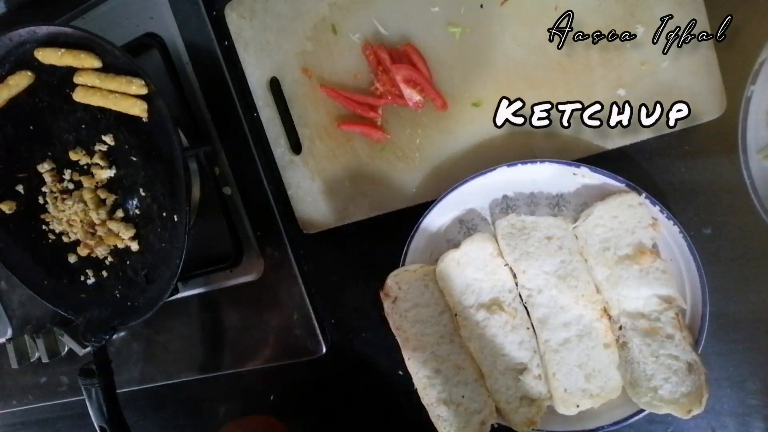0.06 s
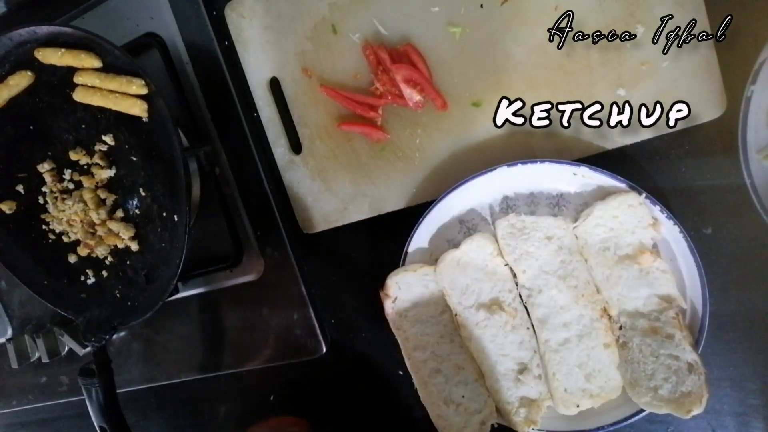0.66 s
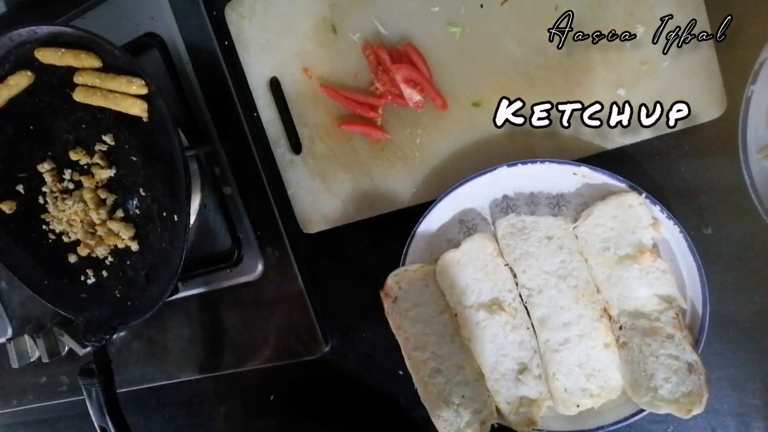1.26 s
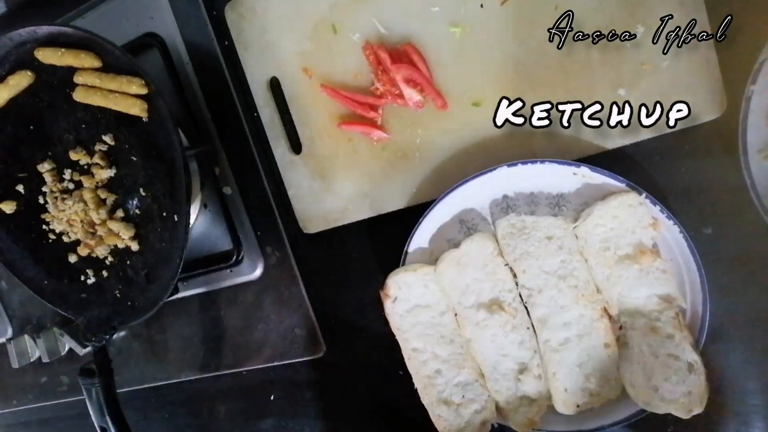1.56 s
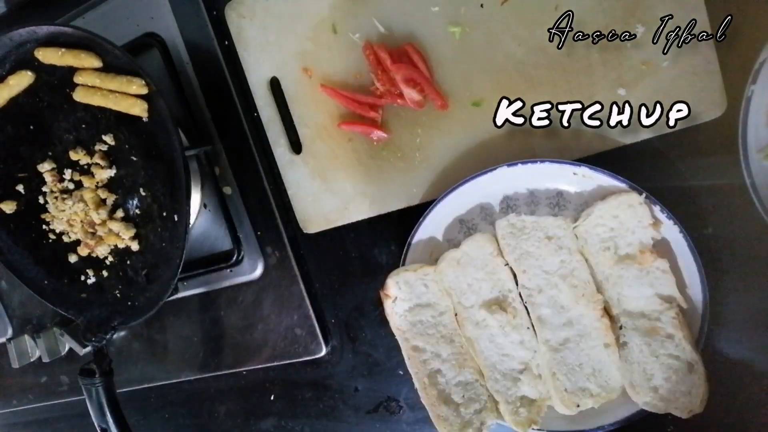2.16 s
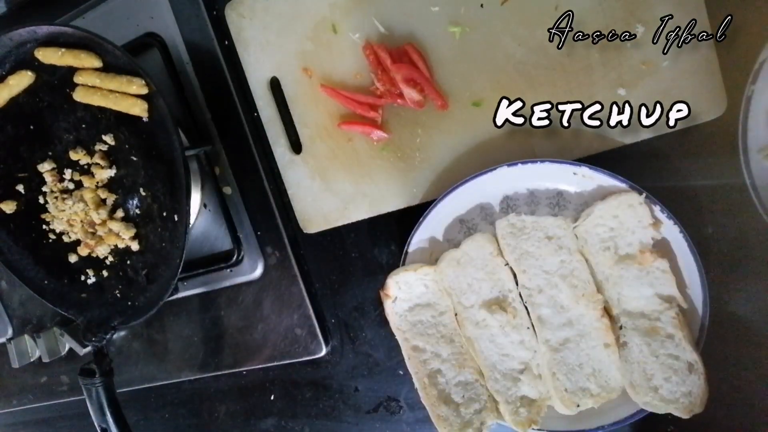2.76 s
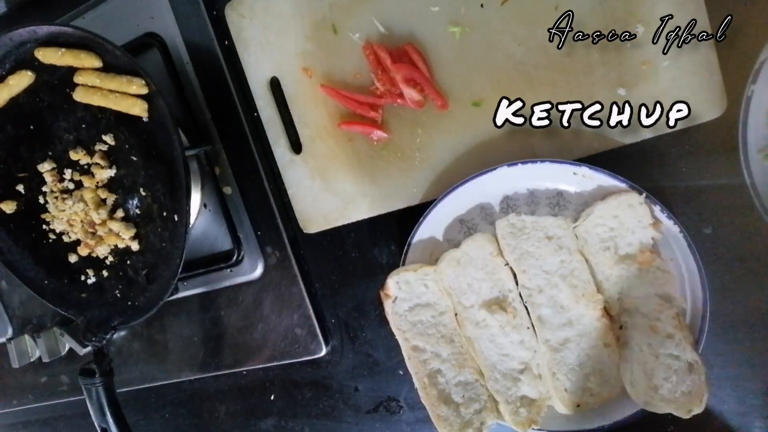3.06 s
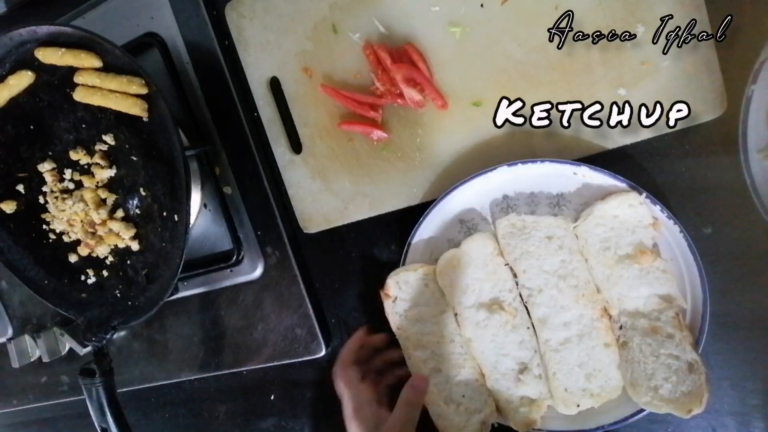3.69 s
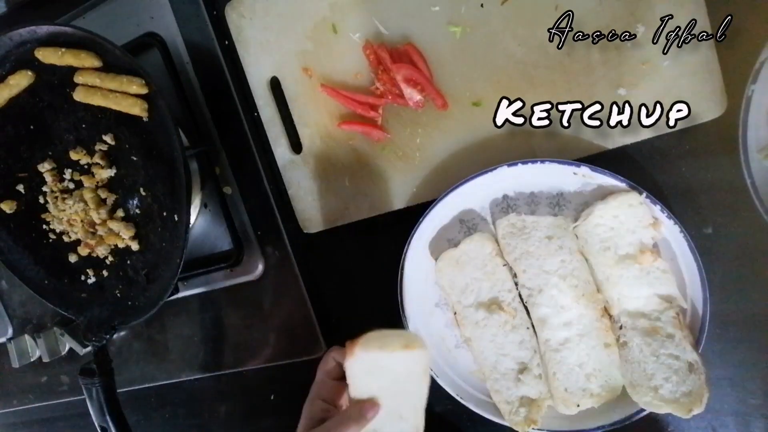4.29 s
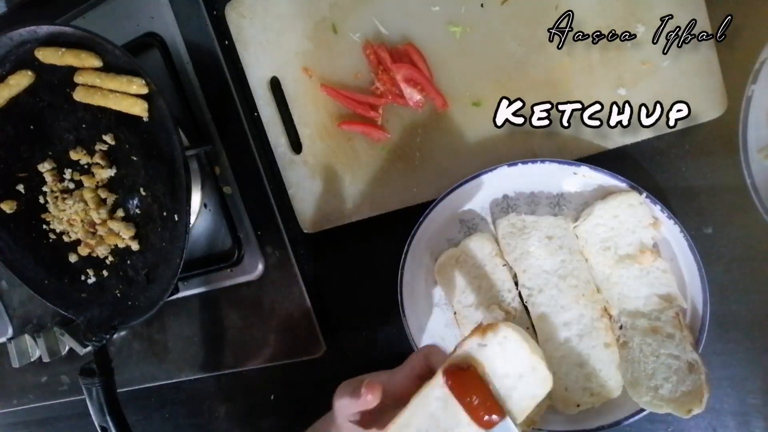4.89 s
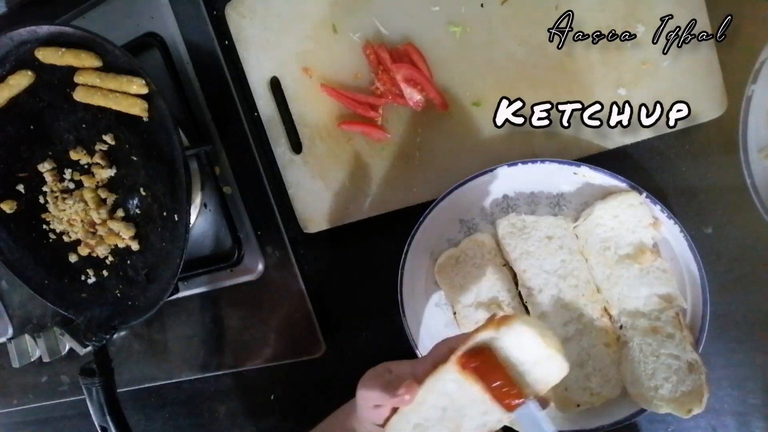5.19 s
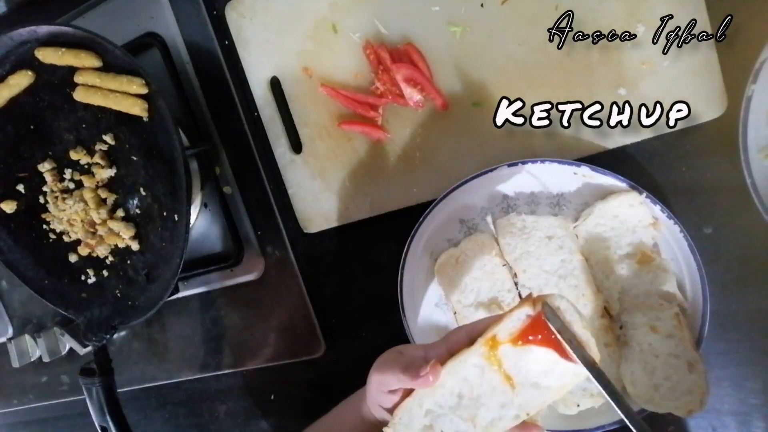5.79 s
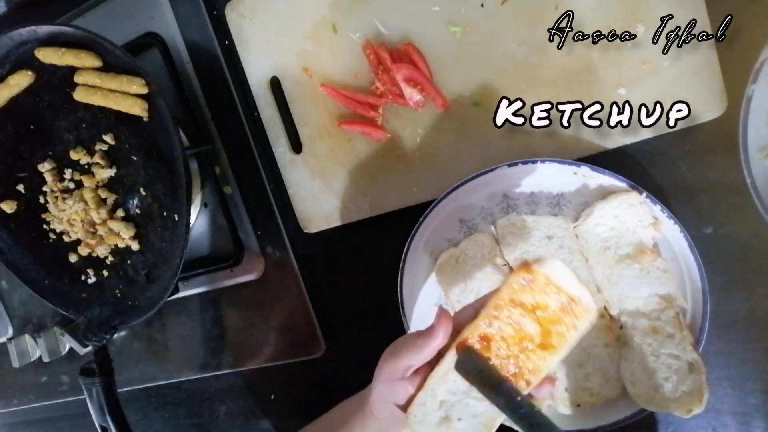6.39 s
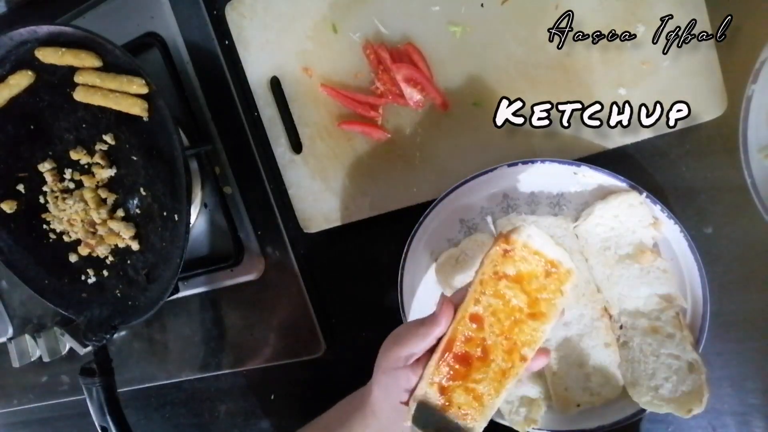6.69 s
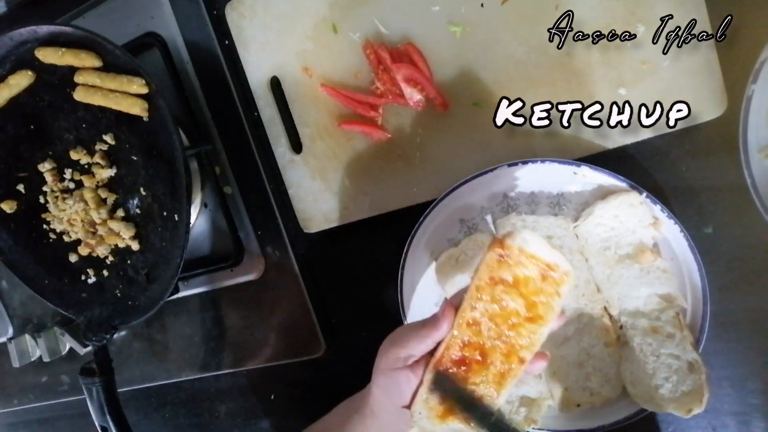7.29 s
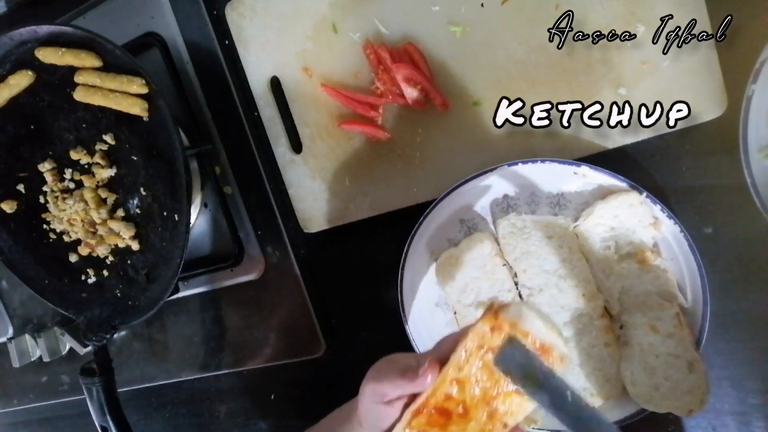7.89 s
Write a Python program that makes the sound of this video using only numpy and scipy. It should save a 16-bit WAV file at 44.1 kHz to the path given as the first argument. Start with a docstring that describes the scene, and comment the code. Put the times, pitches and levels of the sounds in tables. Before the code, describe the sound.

Close over a kitchen counter, a clink dies away and steel cutlery slides on crockery with brief, rough squeals during the first second, while a very faint car horn fades far off to the left. Light cutlery clinks follow from about 1.2 to 2.2 seconds. At 2.3 a plate's rim is struck sharply, and at 2.5 and 2.7 a dish lands in two double knocks that ring the counter, the loudest moment. Around 4 seconds come a few more clinks and a short squeak. From 5 to 5.6 the crust of a toasted bun crackles faintly in a hand. A knife then scrapes a spread across it, with a longer stroke from 6 to 6.9 and a shorter one from 7.2 to 7.6, breaking crumbs and catching on ridges. Low room air, an appliance hum and a soft hiss continue underneath.

```python
"""Spreading a toasted bun.

Close over a kitchen counter, steel cutlery clinks, slides and squeals on crockery. A plate's rim is
struck and a dish lands in two double knocks that ring the counter. Crust crackles in the hand, then
a knife scrapes a spread over the bun in two strokes, breaking crumbs and catching on ridges.
A far car horn fades at the start; low room air, an appliance hum and a soft hiss lie underneath."""
import sys
import numpy as np
from scipy import signal
from scipy.fft import rfft, irfft
from scipy.io import wavfile
from scipy.ndimage import uniform_filter1d

SR = 44100
rng = np.random.default_rng(int(sys.argv[2]) if len(sys.argv) > 2 else 0)


def to_wav(sig):
    """Store sig (one row per channel, or 1-D mono) as 16-bit WAV at the path in sys.argv[1].

    Samples outside -1..1 are clipped; the rate is SR.
    """
    pcm = np.clip(np.atleast_2d(sig), -1, 1) * 32767
    pcm = np.round(pcm).astype(np.int16)
    wavfile.write(sys.argv[1], SR, pcm.T)  # frames by channels


N = 355005
T = np.arange(N) / SR


def knife_on_bun(flakes_db=-9, blade_db=-6, stall_db=-7, touch_s=0.043, press_in_db=17.5, tip_db=-2):
    """The blade breaks crumbs and flakes over the bun's hollow rasp; at ridges it stalls and crunches."""
    # firm strokes, each followed by a light wipe:
    # start_s, press_in_s, length_s, level_db, hollow_db, left_minus_right_db, lift_db_per_s
    strokes = [(6.129, 0.27, 0.62, -44.5, -2.5, 0, 320), (6.788, 0.068, 0.095, -45.5, -15, 3, 452),
               (7.25, 0.14, 0.14, -38.5, 0.5, 0, 158), (7.459, 0.015, 0.12, -52, -18, 6, 300)]
    # ridges of crust that catch the blade: start_s, level_db, length_s, stall_before_s
    catches = [(5.999, -52, 0.041, 0.01), (6.151, -46, 0.009, 0.01), (6.298, -47.5, 0.027, 0.0037),
               (6.4315, -44.5, 0.021, 0.019), (6.518, -52, 0.0084, 0.028), (6.749, -43, 0.013, 0.037),
               (6.811, -47, 0.017, 0.016), (7.304, -47, 0.013, 0.02), (7.487, -40, 0.0096, 0.015),
               (7.531, -50.5, 0.022, 0.009), (7.585, -47, 0.023, 0.015)]
    # tone of the hollow rasp, the crumbs and the crisp flakes: frequency_hz, level_db
    rasp_colour = [(200, -82), (550, -11.5), (820, -3.5), (1050, 3), (1400, 3), (1870, -0.5), (2250, 1),
                   (3000, 0), (4200, -5), (6600, -31)]
    crumb_colour = [(500, -56), (1470, -26), (2400, -3), (2950, -8.5), (4100, -13.5), (5000, 1), (5900, 0),
                    (6700, 3), (7400, 4), (8000, -5), (10500, -9), (12700, -9), (15000, -15), (15800, -43)]
    flake_colour = [(3000, -13), (8500, -22), (11400, -4), (11850, 5.5), (12500, -12), (13200, 2),
                    (13700, 0), (14800, 9), (15600, -29)]
    # the blade's ring, damped by the bun: pitch_hz, level_db, t60_s
    blade_modes = [(2980, -5, .016), (5820, 0, .02), (6200, -2, .016), (7450, -3, .014), (11900, -8, .012)]
    # resonances shift as the contact moves
    rasp = colour(friction(per_s=2200, spread_db=2.6, smear_s=.012), rasp_colour)
    rasp = unit(drift(rasp, share=.08, rate_hz=14))
    crumbs = drift(friction(per_s=2900, spread_db=3.3, smear_s=.009), share=.05, rate_hz=12)
    crumbs = unit(colour(crumbs, crumb_colour))
    flakes = unit(colour(friction(per_s=600, spread_db=3.2, smear_s=.005), flake_colour))
    blade = through(friction(per_s=2000, spread_db=3, smear_s=.005), ring(blade_modes)[None])
    blade = drift(unit(blade), share=.02, rate_hz=10)
    crisp = 0.95 * crumbs + amp(flakes_db) * flakes + amp(blade_db) * blade
    drag = unit(amp(1.6 * walk(110)))
    for start, _, length, stall_s in catches:
        times = [start - stall_s, start - stall_s / 2, start, start + length]
        drag *= np.interp(T, times, [1, amp(stall_db), amp(stall_db), 1])
    out, pressed = np.zeros((2, N)), np.zeros(N)
    for start, press_s, length, db, hollow_db, side_db, lift_db_per_s in strokes:
        age = T - start
        contact = np.clip(age / touch_s, 0, 1) * amp(-lift_db_per_s * np.clip(age - length, 0, 1))
        force = amp(db - press_in_db * np.clip(1 - age / press_s, 0, 1))
        # tipping towards its edge, the blade loses some rasp
        hollow = amp(hollow_db + tip_db * np.clip(age / length, 0, 1) ** 2)
        out += contact * force * drag * pan(side_db) * (crisp + hollow * rasp)
        pressed += contact * hollow
    # a catch sounds hollower the harder the blade bears on the bun
    crunch = crisp + (amp(-15) + amp(-4) * pressed) * rasp
    out += crunch * sum(amp(db + 1) * grip(start, length) for start, db, length, _ in catches)
    out += amp(-53) * grip(start_s=7.188, length_s=0.01) * rasp  # the flat laid on the soft crumb
    return out + room(out, wet_db=-8.5)


def dish_down(clack_db=-6, counter_db=-31, rattle_db=-30, crack_db=-41, rise_s=0.0017, side_db=-7):
    """Each knock clacks the dish, rings the counter and rattles what is on it; long contact is duller."""
    # the dish meeting the counter: start_s, level_db, contact_ms
    knocks = [(2.501, 3, 0.14), (2.532, -4.5, 0.77), (2.7148, -3.5, 0.8), (2.728, -9, 0.84)]
    # the dish's short clack and the counter's longer ring: pitch_hz, level_db, t60_s
    dish_modes = [(974, -3.5, 0.02), (1096, -4, 0.018), (1800, -7, 0.015), (480, -34, 0.015)]
    counter_modes = [(129, 0, .24), (328, -19, .5), (388, -10, .34), (458, -20, .5), (592, -14, .45),
                     (657, -12, .35), (727, -14, .45), (813, -13, .38), (920, -12, .22), (950, -11, .2),
                     (1044, -9, .16), (1244, -15, .25), (1357, -16, .26), (1507, -19, .33),
                     (1701, -16, .25), (1873, -18, .24)]
    # tone of the rattle: frequency_hz, level_db
    rattle_colour = [(47, -49.5), (80, -14.5), (130, -7), (232, -18.5), (385, -18.5), (487, -13),
                     (950, -9.5), (1160, -15.5), (1760, -17), (2070, -23.5), (2610, -27), (3750, -47.5),
                     (6000, -54), (7800, -83), (13200, -120)]
    blows = np.zeros(N)
    for start, db, contact_ms in knocks:
        push = np.exp(-T[:SR // 100] * 1000 / (contact_ms / 2))
        add(blows, start, amp(db) * push / push.sum())
    clack = amp(clack_db) * ring(dish_modes) * (1 - np.exp(-T[:SR] / rise_s))
    counter = amp(counter_db) * ring(counter_modes)
    rattle = colour(burst(t60_s=0.45), rattle_colour)
    rattle *= amp(rattle_db) / np.sqrt(np.mean(rattle[:, :SR // 20] ** 2))
    near = through(blows, (clack + counter + rattle) * pan(side_db))
    # only the first contact is hard enough to crack in the treble: frequency_hz, level_db
    crack_colour = [(2000, -5), (3800, -12.5), (5500, 14), (7000, -6), (9000, -42.5), (15000, -22.5)]
    crack = colour(burst(t60_s=0.019), crack_colour)
    add(near, knocks[0][0], amp(crack_db) * crack / np.abs(crack).max())
    near = butter(near, 85, "high")  # the counter radiates little below its lowest mode
    return near + room(through(blows, clack * pan(side_db)), wet_db=-9)


def rim_clink(start_s=2.3347, ring_db=-22, crack_db=-25, rise_s=.0018, side_db=-1):
    """A firm blow on a plate's rim: a dense crack and a quickly damped ring, carried on by the room."""
    # the plate's ring: pitch_hz, level_db, t60_s
    rim_modes = [(1350, -16, .014), (2520, -2, .014), (2700, -1.5, .014), (2980, -2.5, .012),
                 (4425, -8.5, .018), (4880, -8, .02), (5330, -4.5, .016), (6605, -11, .014),
                 (8915, -17, .012), (9940, -14, .012)]
    # tone of the crack: frequency_hz, level_db
    crack_colour = [(700, -25), (1300, -8), (2700, 0), (3700, -7), (5200, 2), (7800, -12),
                    (10000, -10), (11000, -28)]
    crack = colour(burst(t60_s=.024), crack_colour)
    build_up = 1 - np.exp(-T[:SR] / rise_s)
    out = np.zeros((2, N))
    add(out, start_s, amp(ring_db) * ring(rim_modes) * build_up * pan(side_db))
    add(out, start_s, amp(crack_db) * crack / np.abs(crack).max())
    return out + room(out, wet_db=0.8)


def cutlery_clinks(ring_db=-22, rise_s=0.002, chatter_t60_s=.014, bounce_s=0.013, bounce_db=-16):
    """Light touches chatter through the steel's modes, then ring; the struck spot favours two pitches."""
    # cutlery touching crockery:
    # start_s, level_db, treble_db, left_minus_right_db, free_ring_db, first_pitch_hz, second_pitch_hz
    clinks = [(0.244, -33.5, 5, 2, 1, 3500, 6610), (1.172, -41, 8, 0, 1, 2760, 2760),
              (1.2803, -39, 8.5, 0, -3, 2760, 6611), (1.405, -34.5, 11, 8.5, 9, 3400, 3100),
              (1.410, -39, 5, -12, -12, 5380, 6610), (1.818, -38.5, 10, -1, -4.5, 4460, 2720),
              (2.038, -47.5, 5.5, 7, 9, 2730, 6610), (2.116, -34.5, 6, -2, -6, 7860, 3430),
              (2.176, -45.5, 8, 0, -6, 7400, 9200), (3.923, -37.5, -9, -7, -5, 5380, 2400),
              (4.051, -36.5, -12, -6, 7, 4520, 5450), (4.079, -40, -15, -21.5, -6, 7450, 3100)]
    # the cutlery's ring: pitch_hz, level_db, t60_s
    steel_modes = [(1400, -7, .15), (2760, -2, .11), (2990, -2, .08), (3520, -3, .11), (3620, -7, .08),
                   (4560, -4, .12), (4820, -6, .12), (5380, -2, .22), (6611, -1, .15), (7400, -5, .1),
                   (9200, -8, .05), (11060, -8, .08)]
    # tone of the contact tick: frequency_hz, level_db
    tick_colour = [(600, -25), (1400, -2), (2000, -6), (2800, 0), (4200, 1.5), (6000, 0), (9000, -10),
                   (15000, -18)]

    def nearness(hz, spot_hz, width_octaves=.09):
        return np.exp(-(np.log2(hz / spot_hz) / width_octaves) ** 2)

    out = np.zeros((2, N))
    bite = np.minimum(T[:SR] / rise_s, 1)
    for start, db, treble_db, side_db, free_db, first_hz, second_hz in clinks:
        freedom = min(amp(free_db / 2), 1)  # steel that stays in contact rings weaker and shorter
        modes = [(hz, mode_db + 10 * nearness(hz, first_hz) + 7 * nearness(hz, second_hz), t60 * freedom)
                 for hz, mode_db, t60 in steel_modes]
        touch = burst(t60_s=0.03) * bite
        damped = ring([(hz, mode_db, chatter_t60_s) for hz, mode_db, _ in modes])
        chatter = through(touch, damped[None])[:, :SR]
        tone = [(hz, band_db + treble_db * (hz > 8000)) for hz, band_db in tick_colour]
        tick = colour(unit(chatter) + amp(1) * unit(touch), tone)
        tick /= np.abs(tick).max()
        after_ring = amp(ring_db + free_db) * ring(modes) * bite / 2
        add(out, start, amp(db) * pan(side_db) * (tick + after_ring))
        # a loosely held piece touches again, more softly
        add(out, start + bounce_s, amp(db + bounce_db) * pan(side_db) * tick)
    return out + room(out, wet_db=-5.5)


def steel_on_glaze(ring_db=-5.5, ring_t60_s=.014, judder_db=1.5, grip_s=0.00033, skid_s=0.12):
    """A clink dies away; then sliding steel judders over glaze, ringing and squealing as it goes."""
    # a steel clink dying away at the start, then slides on crockery:
    # start_s, length_s, level_db, skid_off_db, fade_db_per_s, left_minus_right_db
    contacts = [(0.0, 0.0027, -42, 1.5, 135, -3), (0.25, 0.29, -57, 1.5, 350, 1),
                (0.541, 0.033, -52, -0.5, 597, -1), (4.052, 0.17, -49.5, 4, 1100, -1.5)]
    # tone of the dying clink, then of the three slides, one list each: frequency_hz, level_db
    contact_colours = [
        [(700, -37), (1460, -25), (1900, -28), (2650, -6.5), (3700, -21), (4500, -10.5), (5200, -2.5),
         (5900, -7.5), (6500, -9), (8000, -15.5), (10000, -29), (11000, -26), (15000, -33)],
        [(600, -33), (1000, 1), (1250, -6.5), (1500, 7.5), (2000, -17), (2650, 5.5), (3300, -5), (4100, -5),
         (5500, -7), (6600, -2.5), (9000, -17), (15000, -26)],
        [(900, -25), (1600, -5), (2100, -1), (3050, 2.5), (4100, -10), (4800, -3), (6500, -10), (8000, -8),
         (10000, -29), (15000, -25)],
        [(500, -50), (900, -12), (1200, -17), (1800, -10.5), (3200, -5.5), (4600, -3.5), (5350, -1),
         (6400, 0.5), (7400, -6.5), (8600, -16), (11000, -25), (15000, -30)],
    ]
    # the ring of steel pressed on glaze: pitch_hz
    pressed_modes = [2650, 3200, 3900, 4600, 5300, 6380, 6680, 7400, 9780, 10600, 11800, 12400, 14500]
    slips = friction(per_s=2700, spread_db=3, smear_s=0.025)
    singing = through(slips, ring([(hz, 0, ring_t60_s) for hz in pressed_modes])[None])
    singing = drift(singing, share=.02, rate_hz=35)  # the moving contact shifts the modes
    steel = (unit(slips) + amp(ring_db) * unit(singing)) * amp(judder_db * walk(140))
    out = np.zeros((2, N))
    for (start, length, db, skid_db, fade_db_per_s, side_db), tone in zip(contacts, contact_colours):
        past_end = T - start - length
        skid = np.exp(np.clip(past_end / skid_s, -20, 0))
        attack = np.clip((T - start) / grip_s, 0, 1)
        gain = amp(db - 1 + skid_db * skid - fade_db_per_s * np.clip(past_end, 0, 1))
        out += unit(colour(steel, tone)) * attack * gain * pan(side_db)
    out += squeals()
    return out + room(out, wet_db=-5)


def squeals(sag_share=0.0262, waver_share=.032, flutter_db=4.5, fall_power=1.97):
    """Sticking and slipping steel locks into brief rough tones that sag in pitch as they die."""
    # stick-slip tones: start_s, rise_s, length_s, pitch_hz, level_db, roughness
    tones = [(0.24, 0.0037, 0.35, 3540, -47.5, 0.58), (0.25, 0.037, 0.5, 1450, -61.5, 0.78),
             (0.333, 0.028, 0.14, 1013, -50.5, 1.1), (0.374, 0.033, 0.278, 2724, -51.5, 1.07),
             (0.495, 0.07, 0.22, 1592, -46, 0.68), (4.076, 0.0055, 0.059, 907, -46, 0.4),
             (4.11, 0.008, 0.22, 5420, -45.5, 0.32)]
    out = np.zeros(N)
    waver, flutter = walk(250)[:SR], walk(150)[:SR]
    for start, rise_s, length, hz, db, roughness in tones:
        progress = np.minimum(T[:SR] / length, 1)
        pitch_hz = hz * (1 - sag_share * progress) * (1 + waver_share * roughness * waver)
        swell = np.minimum(T[:SR] / rise_s, 1) * (1 - progress) ** fall_power
        tremble = unit(amp(flutter_db * roughness * flutter))
        add(out, start, amp(db) * swell * tremble * sine(pitch_hz))
    return out


def bun_in_hand():
    """The crust gives a little and crackles under the fingers that hold the bun."""
    # small squeezes: start_s, level_db, length_s
    squeezes = [(5.03, -63, .07), (5.084, -59, .008), (5.2, -61, .008), (5.233, -61, .006),
                (5.36, -64, .06), (5.494, -57.5, .012), (5.559, -61, .006)]
    # tone of the crackle: frequency_hz, level_db
    crackle_colour = [(600, -20), (1500, -4), (2800, 0), (4100, -5), (6500, -2), (9000, -8), (15000, -16)]
    crackle = unit(colour(friction(per_s=900, spread_db=3.5, smear_s=.008), crackle_colour))
    out = crackle * sum(amp(db) * grip(start, length) for start, db, length in squeezes)
    return out + room(out, wet_db=-7)


def far_horn(fade_start_s=0.32, fade_end_s=1.0, flutter_db=2, waver_share=0.0151):
    """A far car horn's notes waver on their way in from the street, off to the left."""
    # the horn's chord: pitch_hz, level_db
    notes = [(350, -68.5), (420, -67.5), (495, -71.5), (1450, -81.5)]
    chord = sum(amp(db + flutter_db * walk(13.8)) * sine(hz * (1 + waver_share * walk(39.9)))
                for hz, db in notes)
    chord *= np.sqrt(2) * np.interp(T, [fade_start_s, fade_end_s], [1, 0])
    return chord * pan(side_db=23) + room(chord, wet_db=-4.5)


def room_tone(air_db=-59.5, hiss_db=-60.5, swell_db=1.3, alike_below_hz=350):
    """Low, gently swelling air, much alike on both sides in the bass, and an even hiss."""
    # tone of the kitchen's air and of its hiss: frequency_hz, level_db
    air_colour = [(12, -35.5), (20, 3.5), (33, -7.5), (75, -9.5), (136, 1.5), (246, -17), (306, -13.5),
                  (401, -16), (424, -14), (464, -14), (498, -15.5), (608, -12.5), (642, -15.5), (742, -14),
                  (797, -18), (1500, -28.5), (1950, -72), (3300, -120)]
    hiss_colour = [(710, -37), (1200, -31.5), (1340, -9), (1520, -11.5), (1930, -11), (2610, -8),
                   (2810, -7.5), (4020, -15), (5490, -5.5), (6600, -0.5), (7270, -4), (8730, -17.5),
                   (13600, -19), (15000, -16.5), (15800, -20)]
    mid, side = colour(rng.standard_normal((2, N)), air_colour)
    side = 0.19 * side + 0.61 * butter(side, alike_below_hz, "high", order=1)
    air = np.array([mid + side, mid - side]) / np.std(mid)
    air *= amp(air_db + swell_db * walk(5))
    hiss = amp(hiss_db) * unit(colour(rng.standard_normal((2, N)), hiss_colour))
    return air + hiss


def appliance_hum(trim_db=-1, flutter_db=0.89, waver_hz=1.823):
    """An appliance drones on a few partials, each wavering in level and pitch."""
    # the drone: pitch_hz, level_db, left_minus_right_db
    partials = [(108, -77, -6), (144.7, -79, -4), (307, -81.5, 24.5), (422, -91.5, 4), (507, -77.5, 7),
                (607.4, -77, 15.5), (730, -83.5, -4), (1014, -85.5, 19.5)]
    out = np.zeros((2, N))
    for hz, db, side_db in partials:
        gain = np.sqrt(2) * amp(db + trim_db + flutter_db * walk(4.9))
        out += gain * pan(side_db) * sine(hz + waver_hz * walk(12))
    return out


def room(x, wet_db, low_t60_s=0.64, high_t60_s=0.25, split_hz=2000, rise_s=0.0015):
    """The tiled kitchen's tail alone: it builds up quickly and its treble dies first."""
    tail = butter(burst(low_t60_s), split_hz, "low") + butter(burst(high_t60_s), split_hz, "high")
    return amp(wet_db) * through(x, tail * np.clip(T[:SR] / rise_s, 0, 1))


def friction(per_s, spread_db, smear_s, shared=0.34, direct_db=-4):
    """Dense, uneven slips: some arrive directly in the centre, the rest smeared by nearby surfaces."""
    slips = np.zeros((3, N))  # left, right, centre
    slipping = rng.random((3, N)) < per_s / SR
    polarity = np.sign(rng.standard_normal((3, N))[slipping])
    size = np.minimum(rng.exponential(size=(3, N))[slipping], 4)
    slips[slipping] = polarity * amp(spread_db * size)
    stereo = np.sqrt(shared) * slips[2] + np.sqrt(1 - shared) * slips[:2]
    return through(stereo, burst(smear_s)) + amp(direct_db) * slips[2]


def ring(modes):
    """Damped sines of alternating sign after one blow, from rows of pitch_hz, level_db, t60_s."""
    t = T[:SR // 2]
    sound = sum((-1) ** k * amp(db - 60 * t / max(t60, 1e-3)) * np.sin(2 * np.pi * hz * t)
                for k, (hz, db, t60) in enumerate(modes))
    return np.pad(sound, (0, SR - len(t)))


def burst(t60_s):
    """Dying noise of unit energy, unrelated left and right."""
    noise = rng.standard_normal((2, SR)) * np.exp(-np.log(1000) * T[:SR] / t60_s)
    return unit(noise) / np.sqrt(SR)


def grip(start_s, length_s):
    """Envelope of one brief contact: a quick bite and a rounded fall."""
    progress = np.clip((T - start_s) / length_s, 0, 10)
    return np.minimum(10 * progress, 1) * np.exp(-progress ** 2)


def drift(x, share, rate_hz):
    """Let all resonances of a sound wander up and down together by a share of their pitch."""
    warped_s = np.cumsum(1 + share * walk(rate_hz)) / SR % T[-1]
    return np.array([np.interp(warped_s, T, side) for side in x])


def walk(rate_hz):
    """Smooth random wander with a spread near 1."""
    hold = max(int(SR / rate_hz), 1)
    steps = np.repeat(rng.standard_normal(N // hold + 1), hold)
    return unit(uniform_filter1d(steps, hold)[:N])


def colour(x, points, size=8192):
    """Minimum-phase equaliser through points of frequency_hz, level_db."""
    hz, db = np.transpose(points)
    bins_hz = np.maximum(np.fft.rfftfreq(size, 1 / SR), 1)
    gain = amp(np.interp(np.log(bins_hz), np.log(hz), db))
    cepstrum = irfft(np.log(gain))
    # folded onto positive time, so nothing sounds ahead of an attack
    cepstrum[1:size // 2] *= 2
    cepstrum[size // 2 + 1:] = 0
    response = irfft(np.exp(rfft(cepstrum)))
    return through(x, response[None])[:, :x.shape[-1]]


def butter(x, hz, kind, order=2):
    """Gentle low-pass or high-pass."""
    return signal.sosfilt(signal.butter(order, hz, kind, fs=SR, output="sos"), x)


def through(x, response):
    """Convolve a sound with a one- or two-channel response."""
    return signal.fftconvolve(np.atleast_2d(x), response, axes=-1)[:, :N]


def sine(pitch_hz):
    """A sine that follows a pitch curve."""
    return np.sin(2 * np.pi * np.cumsum(pitch_hz) / SR)


def amp(db):
    """Decibels to gain."""
    return 10 ** (np.asarray(db) / 20)


def unit(x):
    """Scale to rms 1."""
    return x / np.sqrt(np.mean(x ** 2))


def pan(side_db):
    """Left and right gains for a left-minus-right level."""
    return amp(np.array([[side_db], [-side_db]]) / 2)


def add(out, start_s, x):
    """Mix x into out from start_s on."""
    i = max(int(start_s * SR), 0)
    out[..., i:i + x.shape[-1]] += x[..., :N - i]


def scene():
    """Everything at the counter, over the kitchen's background."""
    tableware = dish_down() + cutlery_clinks() + rim_clink() + steel_on_glaze()
    bun = bun_in_hand() + knife_on_bun()
    return tableware + bun + far_horn() + room_tone() + appliance_hum()


def record(dry):
    """A steep low-pass cuts the very top."""
    top_hz = 15750
    return signal.sosfilt(signal.ellip(10, .2, 70, top_hz, fs=SR, output="sos"), dry)


dry = scene()
out = record(dry)
to_wav(out)
```